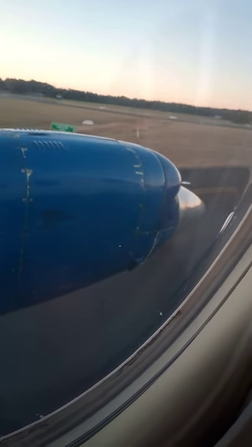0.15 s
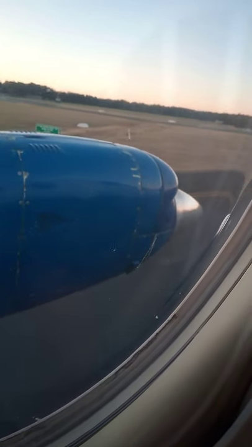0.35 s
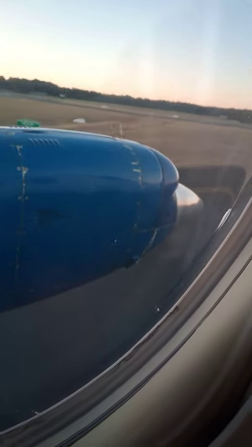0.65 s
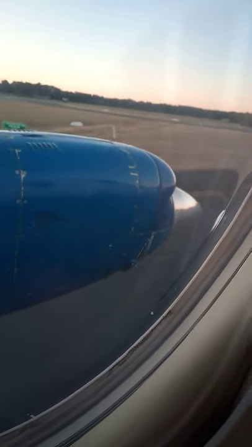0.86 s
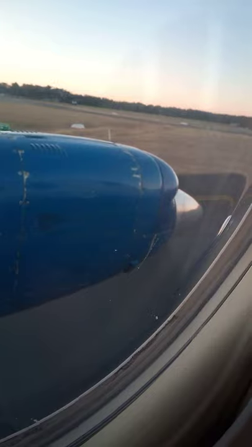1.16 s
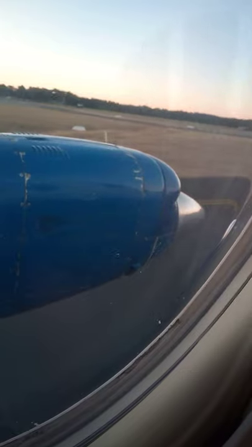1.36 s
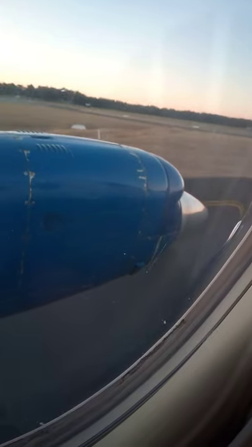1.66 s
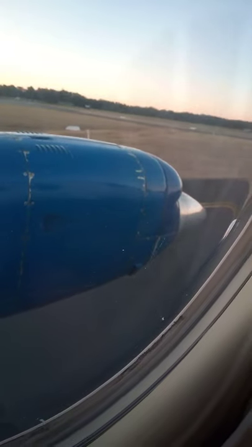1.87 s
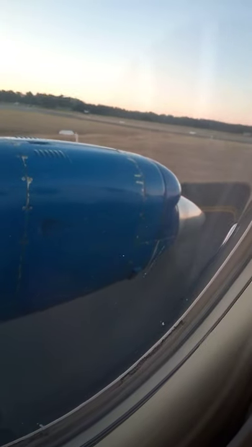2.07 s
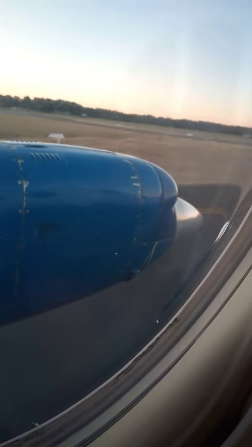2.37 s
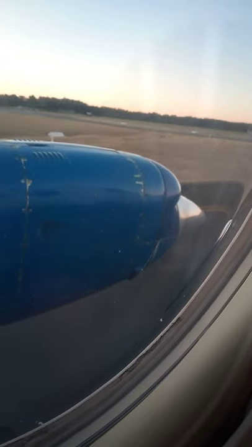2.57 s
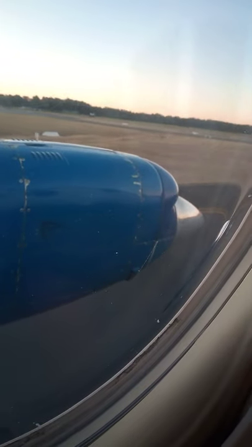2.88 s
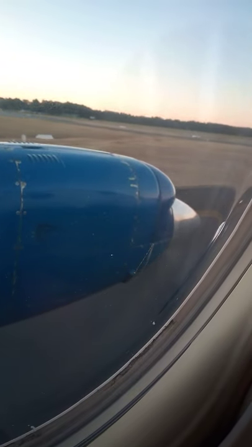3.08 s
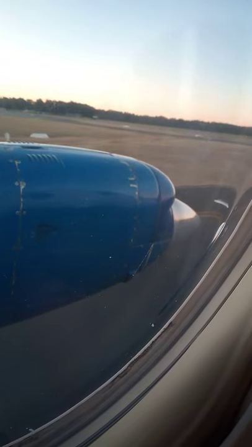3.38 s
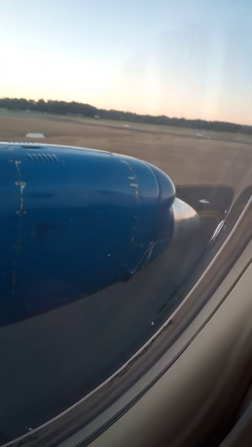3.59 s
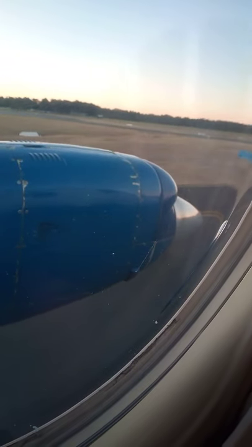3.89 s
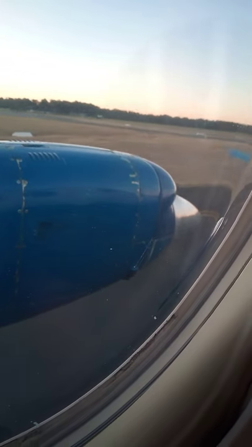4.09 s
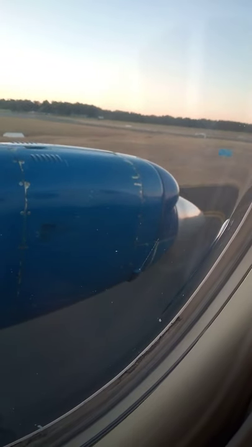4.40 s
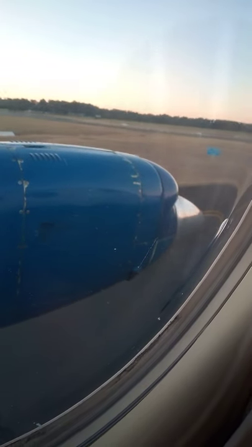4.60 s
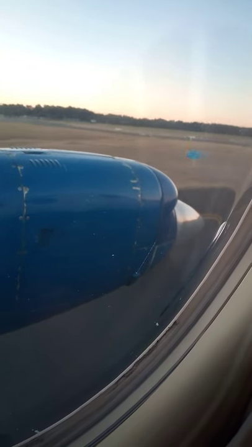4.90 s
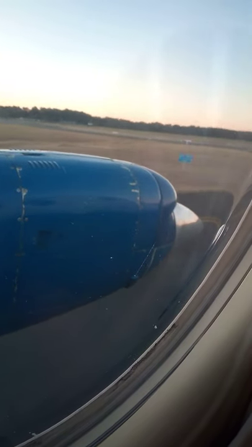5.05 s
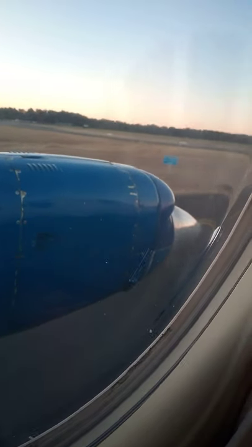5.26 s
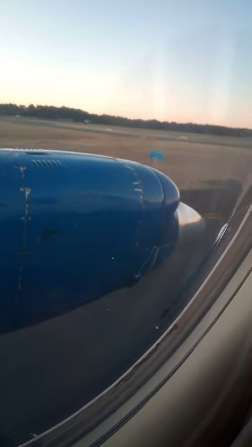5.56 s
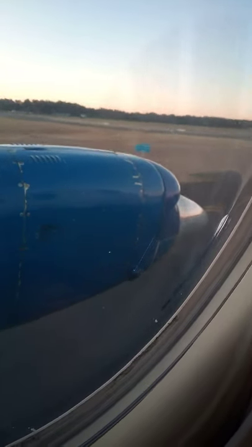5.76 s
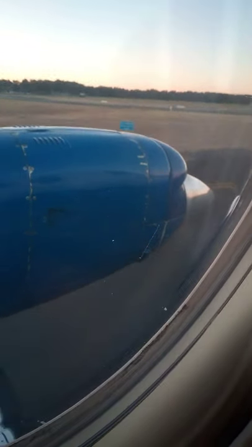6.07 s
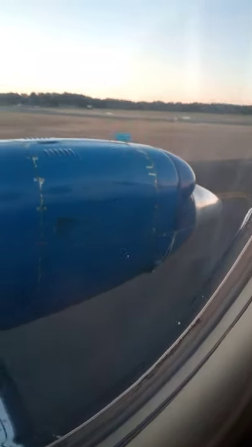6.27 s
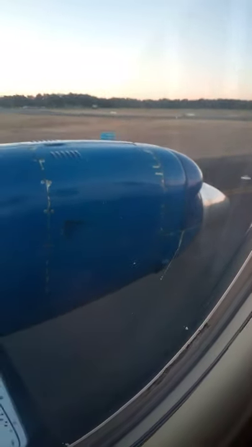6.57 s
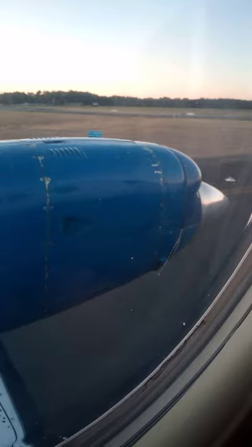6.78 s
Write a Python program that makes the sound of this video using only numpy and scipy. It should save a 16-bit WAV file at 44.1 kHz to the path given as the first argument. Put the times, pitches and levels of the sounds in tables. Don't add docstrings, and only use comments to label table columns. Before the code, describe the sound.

A taxiing turboprop heard from inside the cabin: a steady mid-pitched engine whine throbs rapidly over deep propeller drone, hull rumble and faint vent hiss.

```python
import sys
import numpy as np
from scipy import signal
from scipy.fft import rfft, irfft, next_fast_len
from scipy.io import wavfile

SR = 44100
rng = np.random.default_rng(int(sys.argv[2]) if len(sys.argv) > 2 else 0)


def boost_factor(decibels):
    exponent = np.asarray(decibels, float) / 20
    return 10 ** exponent


def wav_record(signal):
    frames = np.transpose(np.atleast_2d(signal))
    bounded = np.clip(frames, -1, 1)
    quanta = np.round(bounded * 32767).astype(np.int16)
    wavfile.write(sys.argv[1], SR, quanta)


N = 306054

# frequency in Hz, density in dB per Hz.
RUMBLE_SPECTRUM = [(28, -59.5), (48, -66.5), (84, -46), (158, -40.5), (195, -48), (225, -40.5), (258, -50),
                   (300, -42.5), (350, -51), (400, -48), (492, -55.5), (525, -50), (575, -57), (800, -67)]
# frequency in Hz, left and right density in dB per Hz.
ROAR_SPECTRUM = [(40, -72, -70.5), (100, -64.5, -73), (250, -62.5, -58), (430, -58, -59), (585, -61, -58.5),
                 (790, -55, -64), (850, -61, -62), (1030, -59.5, -67.5), (1120, -65, -68),
                 (1580, -70.5, -74.5), (1860, -69.5, -77.5), (2050, -76.5, -78.5), (2620, -77, -84),
                 (2970, -90, -86.5)]
# frequency in Hz, left and right density in dB per Hz.
HISS_SPECTRUM = [(2970, -84, -87.5), (3540, -86.5, -85.5), (4200, -90, -81.5), (4750, -90.5, -80.5),
                 (5140, -90, -77), (5600, -92.5, -78), (6340, -95.5, -83.5), (6740, -97.5, -89.5),
                 (7430, -101, -96), (8350, -109, -102)]
# frequency in Hz, density in dB per Hz.
SELF_NOISE_SPECTRUM = [(8000, -115.9), (8600, -114.8), (9200, -111.7), (10500, -115.7), (12000, -110.9),
                       (13800, -119.3), (14300, -114.1), (15300, -115.0), (15600, -121.7)]
# start in seconds, length in seconds, centre in Hz, level in dB,
# left over right in dB.
RUSTLES = [
    (1.465, .05, 2500, -45, 3),
    (2.885, .05, 4150, -49, -4),
    (3.59, .03, 4200, -56, 0),
    (4.09, .11, 6550, -51, -3),
    (4.715, .04, 2600, -56, 8),
]
# time in seconds, peak in dB.
GAIN_STEPS = [(.115, -56), (.175, -55), (.415, -55), (1.035, -54), (1.515, -51), (1.955, -52), (2.175, -59),
              (2.375, -52), (2.535, -57), (2.655, -56), (3.035, -59), (3.435, -61), (4.155, -54),
              (4.255, -59), (4.375, -57), (4.495, -54), (4.755, -56), (4.815, -59), (4.955, -58),
              (5.195, -54), (5.355, -50), (5.855, -54), (5.895, -50), (5.935, -55), (6.095, -58),
              (6.175, -52), (6.335, -53), (6.495, -56), (6.775, -59)]
# time in seconds, extra shake in dB.
SEAMS = [
    (.85, 1.5),
    (1.45, 1),
    (2.5, 1.2),
    (4.0, .8),
    (4.649, 1.5),
    (5.25, 0.5),
]
# time in seconds, turn from 0 to 1.
HAND_TURN = [
    (0, 0.05),
    (1.2, 0.05),
    (1.5, 0.4),
    (2.2, 0.05),
    (5.92, 0.05),
    (6.08, 0.7),
    (6.5, 0.9),
    (6.94, 0.6),
]
# harmonic, left level in dB, right level in dB, left lead in radians.
GENERATOR_HARMONICS = [(3, -52.8, -60.3, -3.1), (5, -60.2, -61.1, -1.7), (7, -68.1, -76.1, -1.2)]
# frequency in Hz, left level in dB, right level in dB, left lead in radians.
OTHER_SHAFTS = [(16.9, -43, -42.5, 0.1), (33.6, -47.5, -53, -0.1), (76.7, -39.5, -38, 0.11),
                (487, -50.5, -41, -0.5)]
# shaft order, left level in dB, right level in dB, left lead in radians.
PROPELLER_ORDERS = [(3, -60.4, -60.4, -0.2), (4, -27.7, -30.0, -0.2), (8, -23.1, -24.4, 0.0),
                    (9, -35.1, -37.0, -0.2), (12, -40.2, -43.4, -0.1)]
# pump harmonic, shaft side tone number, left level in dB, right level in dB,
# left lead in radians.
PUMP_TONES = [(1, 0, -17.6, -18.2, -0.2), (1, 1, -23.3, -21.3, 0.1), (1, 2, -36.9, -41.9, -0.3),
              (1, 3, -39.0, -34.9, 0.2), (1, 4, -43.5, -38.4, -0.2), (2, -1, -45.8, -50.5, -0.5),
              (2, 0, -36.6, -34.2, 0.3), (2, 1, -50.5, -40.7, 0.6), (2, 2, -46.3, -48.4, -0.6),
              (2, 4, -46.8, -48.2, 0.2), (3, 0, -43.0, -55.3, 1.5), (4, -1, -56.3, -75, 2.8),
              (4, 0, -46.6, -46.2, -0.2), (4, 1, -61.0, -58.4, -3.0), (4, 3, -62.0, -65.0, 1.6),
              (5, 1, -59.3, -74.8, 0.3), (5, 2, -62.1, -64.2, 0.1), (6, 0, -60.8, -59.8, -1.4),
              (7, 0, -61.6, -75, -3.1), (8, 0, -58.6, -66.3, -1.4), (9, 0, -63.1, -73.5, -2.2)]
# harmonic, port (0 left, 1 right),
# loudest moment in seconds, half width in seconds, top in dB.
LOUD_ZONES = [(2, 0, 4.5, 2.2, 1.5), (4, 0, 2, 2.7, 4.5), (4, 1, -2, 3.0, 2)]

PROP_SHAFT_HZ, PUMP_HZ, PUMP_SHAFT_HZ, GENERATOR_HZ = 20.641, 335.213, 24.47, 399.96
PUMP_SHAFT_START_RAD, ZONE_FALL_DB = -2.3, 11.5
SEAM_S, CALM_DB = 0.1, 0.46
RUSTLE_WIDTH_HZ = 900
WHISTLE_HZ, WHISTLE_WIDTH_HZ = 5286, 420
WHISTLE_DB, WHISTLE_SHAKEN_DB, WHISTLE_TURNED_DB = -52, -1.2, -8
FRAME_S, FIRST_FRAME_S = .02, .015
SMALL_STEP_SHARE, SMALL_STEP_DB, STEP_LEAN_DB = .17, -64, 1.5
FADE_IN_S = .001


def rms_one(x):
    return x / np.sqrt(np.mean(x ** 2) + 1e-20)


def in_time(rows):
    s, *columns = np.transpose(rows)
    return [np.interp(np.arange(N) / SR, s, c) for c in columns]


def bump(centre, width, order=2):
    return np.exp(-.5 * np.abs((np.arange(N) / SR - centre) / width) ** order)


def drift(rate):
    r = np.exp(-80 * np.pi * rate / SR)
    slow = signal.lfilter([1], [1, -2 * r, r * r], rng.standard_normal(N // 40 + 4002))[4000:]
    return np.interp(np.arange(N) / 40, np.arange(len(slow)), rms_one(slow - slow.mean()))


def coloured(table, column=1):
    table, size = np.array(table), next_fast_len(N)
    hz = np.maximum(np.fft.rfftfreq(size, 1 / SR), 1)
    octaves_outside = np.log2(hz / np.clip(hz, table[0, 0], table[-1, 0]))
    db = np.interp(np.log(hz), np.log(table[:, 0]), table[:, column])
    db = db - 60 * np.abs(octaves_outside)
    spectrum = rfft(rng.standard_normal(size)) * boost_factor(db) * np.sqrt(SR / 2)
    return irfft(spectrum, size)[:N]


def turning(hz, start, slip):
    return 2 * np.pi * hz * np.arange(N) / SR + start + slip * drift(.4)


def tone(angle, left_db, right_db, lead, waver_db):
    left = boost_factor(left_db + waver_db * drift(1.7)) * np.cos(angle + lead)
    right = boost_factor(right_db + waver_db * drift(1.4)) * np.cos(angle)
    return np.sqrt(2) * np.array([left, right])


def rumble(shake_db):
    hull = coloured(RUMBLE_SPECTRUM) * boost_factor(.3 * shake_db + 0.5 * drift(3))
    return np.array([hull, np.roll(hull, 4) * boost_factor(-1.0)])


def roar(shake_db, turn):
    common_db = shake_db + .5 * drift(7.5)
    left_db = common_db - 1.8 * turn + 0.61 * drift(14)
    right_db = common_db + .8 * turn + 0.28 * drift(15)
    return np.array([coloured(ROAR_SPECTRUM, column=1) * boost_factor(left_db),
                     coloured(ROAR_SPECTRUM, column=2) * boost_factor(right_db)])


def vent(shake_db, turn, whistle_db):
    flutter_db = .5 * shake_db + 0.89 * drift(19)
    b, a = signal.iirpeak(WHISTLE_HZ, WHISTLE_HZ / WHISTLE_WIDTH_HZ, fs=SR)
    breath = signal.lfilter(b, a, rng.standard_normal(N))
    nozzle = rms_one(signal.lfilter(b, a, breath))
    nozzle = nozzle * boost_factor(whistle_db + 6.0 + flutter_db + .6 * drift(40))
    left = coloured(HISS_SPECTRUM, column=1) * boost_factor(flutter_db + 4.5 * turn)
    right = coloured(HISS_SPECTRUM, column=2) * boost_factor(flutter_db - .6 * turn)
    return np.array([left + boost_factor(-20.5) * np.roll(nozzle, 30), right + nozzle])


def rustles():
    out = np.zeros((2, N))
    for s, length, hz, db, pan_db in RUSTLES:
        i, n = round(s * SR), round(length * SR)
        edges_hz = [hz - RUSTLE_WIDTH_HZ / 2, hz + RUSTLE_WIDTH_HZ / 2]
        band = signal.butter(4, edges_hz, "band", fs=SR, output="sos")
        rub = signal.sosfilt(band, rng.standard_normal((2, SR // 4)))[:, -n:]
        level = boost_factor([[db + pan_db / 2], [db - pan_db / 2]])
        out[:, i:i + n] += rms_one(rub) * np.hanning(n) ** 0.48 * level
    return out


def generator():
    angle = turning(GENERATOR_HZ, 0, slip=0.073)
    return sum(tone(k * angle, *rest, waver_db=0.8) for k, *rest in GENERATOR_HARMONICS)


def other_shafts():
    return sum(tone(turning(hz, 0, slip=0.37), *rest, waver_db=-0.1) for hz, *rest in OTHER_SHAFTS)


def propeller():
    shaft = turning(PROP_SHAFT_HZ, 0.733, slip=0.022)
    return sum(tone(k * shaft, *rest, waver_db=0.03) for k, *rest in PROPELLER_ORDERS)


def pump():
    pulses = turning(PUMP_HZ, 0.43, slip=0.15)
    shaft = turning(PUMP_SHAFT_HZ, PUMP_SHAFT_START_RAD, slip=0.038)
    swell_db = {}
    for k, port, s, width, top_db in LOUD_ZONES:
        swell_db[round(k), round(port)] = top_db - ZONE_FALL_DB * (1 - bump(s, width, order=6))
    out = 0
    for k, side, left_db, right_db, lead in PUMP_TONES:
        if side == 0:
            left_db = left_db + swell_db.get((k, 0), 0)
            right_db = right_db + swell_db.get((k, 1), 0)
        out = out + tone(k * pulses + side * shaft, left_db, right_db, lead, waver_db=.3 * min(k, 5))
    return out


def scene():
    turn, = in_time(HAND_TURN)
    jolts_db = sum(db * bump(s, SEAM_S) for s, db in SEAMS)
    shake_db = CALM_DB + jolts_db
    whistle_db = WHISTLE_DB + WHISTLE_SHAKEN_DB * jolts_db + WHISTLE_TURNED_DB * turn
    air = rumble(shake_db) + roar(shake_db, turn) + vent(shake_db, turn, whistle_db)
    return air + rustles() + generator() + other_shafts() + propeller() + pump()


def patchy_top(x):
    hz, _, cells = signal.stft(x, SR, nperseg=2048)
    row, column = np.arange(len(hz))[:, None], np.arange(cells.shape[2])
    chance = rng.random(cells.shape)
    streaks = chance[:, row // 3, column // 2]
    holes = chance[:1, -1 - row // 14, column // 2]
    streak_left = np.interp(hz, [5900, 6800, 8200, 15000], [0, .4, .7, .6])
    streak_right = np.interp(hz, [6800, 7600, 8200, 15000], [0, .5, .7, .6])
    hole_right = np.interp(hz, [7000, 8000, 8900, 9200, 15300, 15500], [.05, .45, .35, .28, .28, .7])
    hole_right = hole_right * (hz > 7000)
    hole_left = np.maximum(hole_right, np.interp(hz, [6200, 6700, 8000, 8900], [0, .45, .55, 0]))
    in_streak = streaks < np.array([streak_left, streak_right])[:, :, None]
    in_hole = holes < np.array([hole_left, hole_right])[:, :, None]
    gain = np.where(in_streak | in_hole, boost_factor(-30), 1)
    return signal.istft(cells * gain, SR, nperseg=2048)[1][:, :N]


def gain_ticks():
    clicks = np.full((2, N), 1e-18)
    edges = np.arange(FIRST_FRAME_S, N / SR - FRAME_S, FRAME_S)
    small = edges[rng.random(len(edges)) < SMALL_STEP_SHARE]
    small_steps = [(s, SMALL_STEP_DB + 2 * rng.standard_normal()) for s in small]
    s, peak_db = np.transpose(small_steps + list(GAIN_STEPS))
    pan_db = STEP_LEAN_DB + 2 * rng.standard_normal(len(s))
    at = np.round(s * SR).astype(int) + 46
    clicks[:, at] = boost_factor(peak_db + 19 + pan_db * [[.5], [-.5]])
    ring = signal.sosfilt(signal.butter(2, [11300, 12700], "band", fs=SR, output="sos"), clicks)
    wide = signal.sosfilt(signal.butter(2, [6000, 15500], "band", fs=SR, output="sos"), clicks)
    return ring + boost_factor(-6) * wide


def roll_off(x):
    return signal.sosfilt(signal.butter(12, 15800, fs=SR, output="sos"), x)


def record(dry):
    x = boost_factor(.5) * dry / (1 + (dry / .8) ** 4) ** .25
    x = x * np.minimum(np.arange(N) / (FADE_IN_S * SR), 1)
    self_noise = np.array([coloured(SELF_NOISE_SPECTRUM), coloured(SELF_NOISE_SPECTRUM)]) * boost_factor(7.0)
    mix = patchy_top(x + self_noise) + gain_ticks()
    return roll_off(mix)


dry = scene()
out = record(dry)
wav_record(out)
```